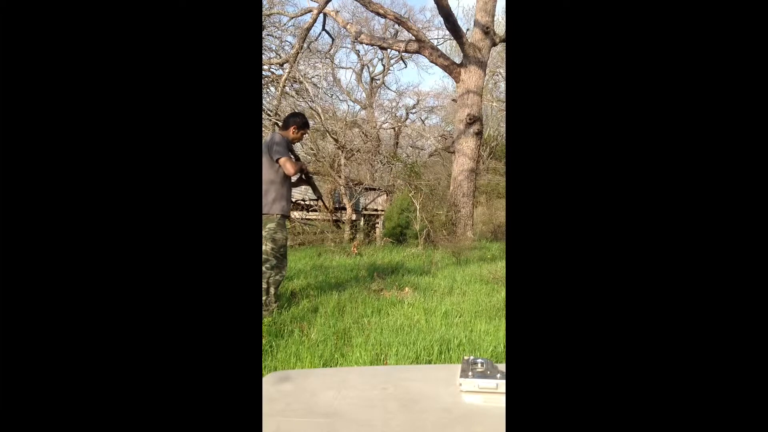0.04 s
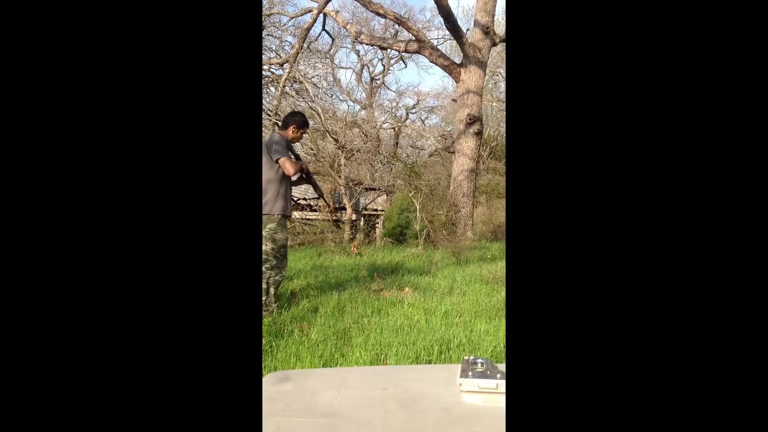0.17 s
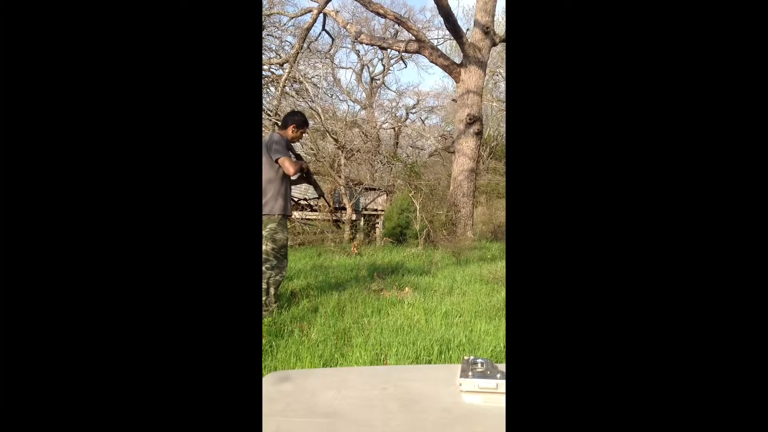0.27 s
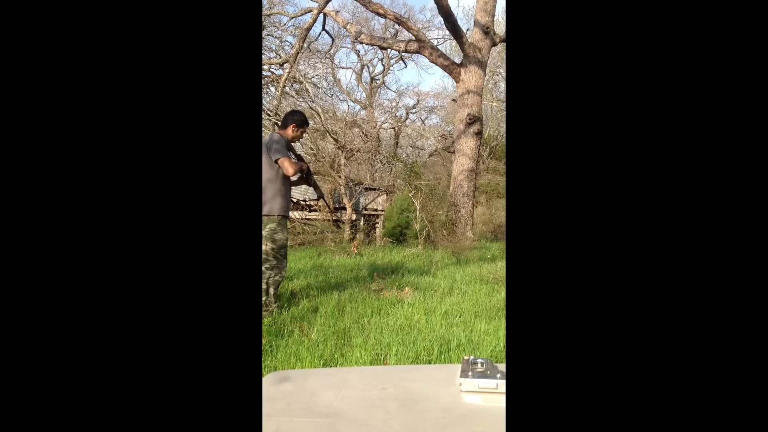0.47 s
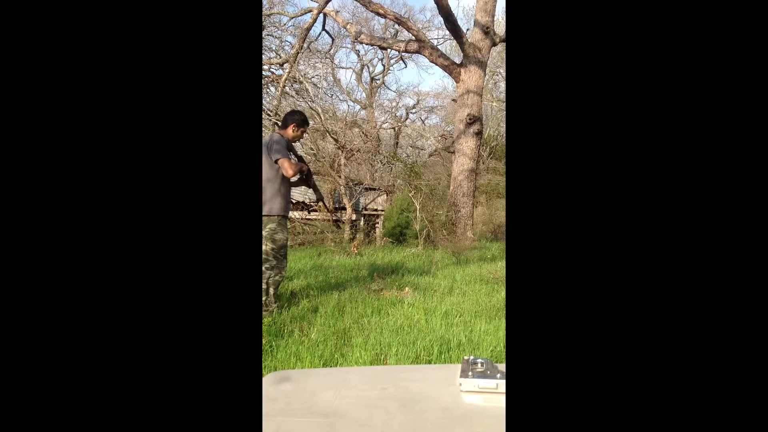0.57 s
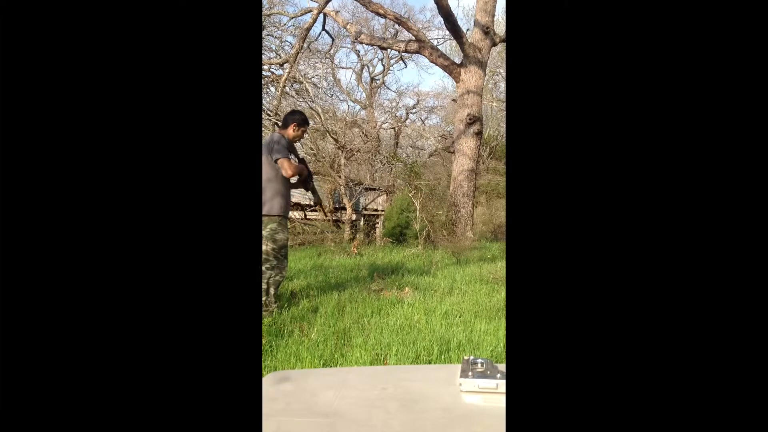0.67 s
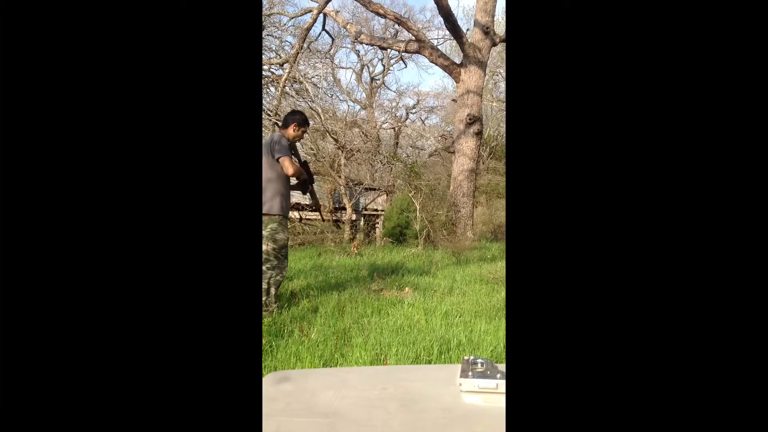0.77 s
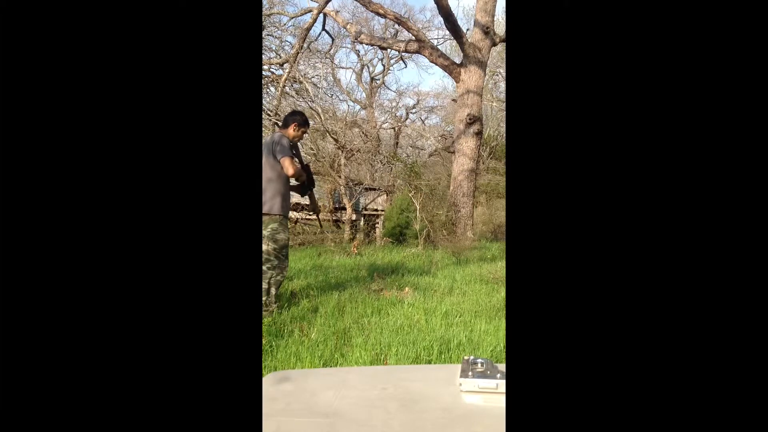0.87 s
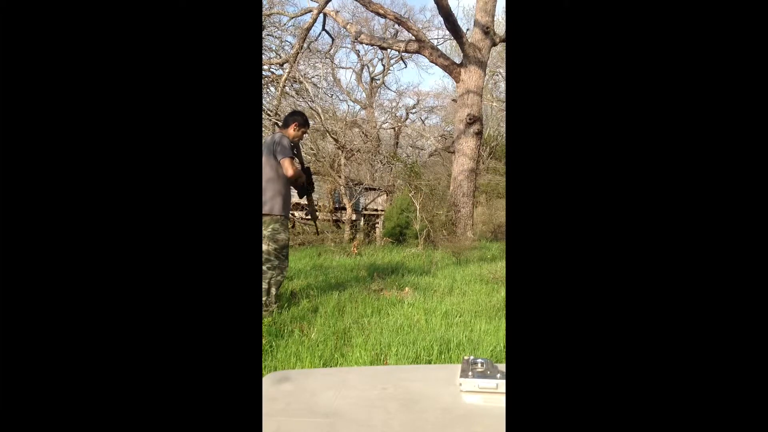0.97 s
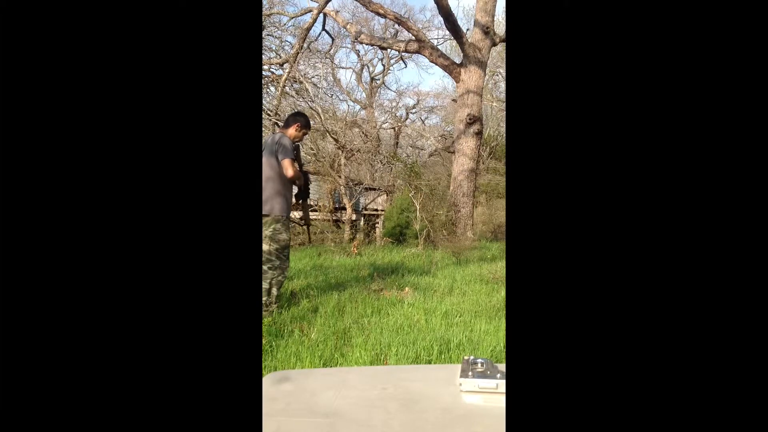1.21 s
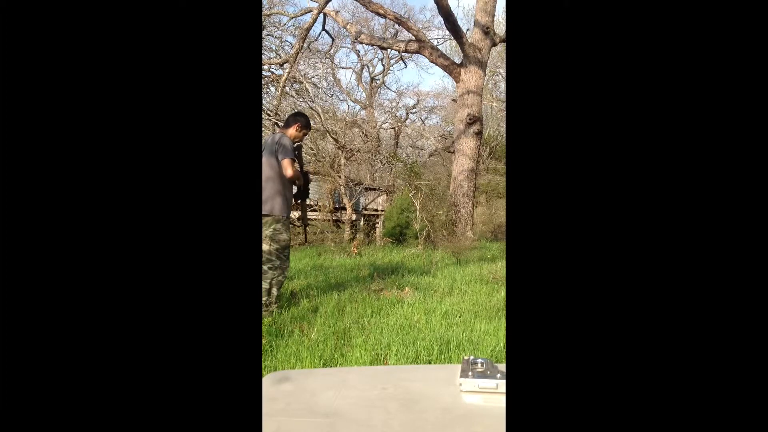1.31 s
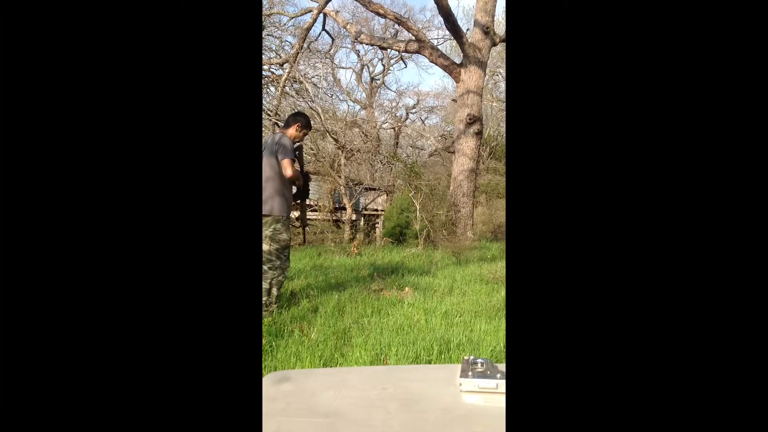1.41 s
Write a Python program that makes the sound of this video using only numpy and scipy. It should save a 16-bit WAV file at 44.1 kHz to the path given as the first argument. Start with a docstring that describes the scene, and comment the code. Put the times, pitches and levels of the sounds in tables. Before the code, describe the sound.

In a quiet yard among trees, a small bird chips, then a rifle bolt slides shut with a bright metallic clack that rings and echoes briefly. Hands shift softly on the rifle while birds whistle far off.

```python
"""In a wooded yard, a rifle's bolt is let go: the catch snaps, the carrier scrapes forward on its spring
and slams shut, steel on steel. The rifle rings briefly, a wall throws back an echo and the trees
scatter a tail. Hands knock and rub lightly on the rifle before and after. A small bird chips twice
nearby; others whistle far off over a faint outdoor hush."""
import sys
import numpy as np
from scipy import signal
from scipy.fft import rfft, irfft
from scipy.io import wavfile

SR = 44100
rng = np.random.default_rng(int(sys.argv[2]) if len(sys.argv) > 2 else 0)


def master_out(mix):
    """Clip the mix to full scale and print it as 16-bit PCM to the path in sys.argv[1]."""
    frames = np.transpose(np.atleast_2d(mix))
    ceiling = np.clip(frames, -1, 1)
    pcm = np.round(ceiling * 32767).astype(np.int16)
    wavfile.write(sys.argv[1], SR, pcm)


N = 63945
TIME = np.arange(N) / SR
CUTOFF_HZ, SHARP_RISE_S = 15300, .00028

# The catch snapping free. Each row: start in seconds, level in dB, decay time constant in seconds.
CATCH_SNAPS = [(0.2304, -16, .0017)]
# The carrier slamming shut. Each row: start in seconds, level in dB, decay time constant in seconds.
CARRIER_SLAMS = [(0.2796, -13.5, .002), (0.2822, -11.5, .0016)]


def from_db(db):
    """Decibels to gain."""
    return 10 ** (np.asarray(db) / 20)


def unit_rms(x):
    """Scale to rms 1."""
    return x / np.sqrt(np.mean(x ** 2) + 1e-20)


def coloured(x, colour):
    """Shape a signal with an EQ curve drawn on a log-frequency axis, rms 1."""
    hz = np.fft.rfftfreq(N, 1 / SR)
    curve_hz, curve_db = np.transpose(colour)
    gain = from_db(np.interp(np.log(np.maximum(hz, 1)), np.log(curve_hz), curve_db))
    return unit_rms(irfft(rfft(x) * gain * (hz < CUTOFF_HZ) * (hz > 20), N))


def noise(colour):
    """Steady noise of a given colour, rms 1."""
    return coloured(rng.standard_normal(N), colour)


def low_cut(x, hz):
    """Roll off the lows at 12 dB per octave."""
    return signal.sosfilt(signal.butter(2, hz, "high", fs=SR, output="sos"), x)


def drift(per_second):
    """A random wander, roughly between -1 and 1."""
    return np.interp(TIME * per_second, np.arange(1000), rng.standard_normal(1000))


def burst(start, rise, decay):
    """Straight attack, then exponential decay; times in seconds."""
    age = TIME - start
    return np.clip(age / rise, 0, 1) * np.exp(-np.maximum(age - rise, 0) / decay)


def click(start):
    """A unit click."""
    return 1. * (np.arange(N) == int(start * SR))


def ring(drive, hz, t60):
    """One resonance: a unit click sets a sine of height 1 ringing."""
    r, w = from_db(-60 / (t60 * SR)), 2 * np.pi * hz / SR
    return signal.lfilter([0, np.sin(w)], [1, -2 * r * np.cos(w), r * r], drive + 1e-18)


def contacts(rows, colour, rise_s):
    """Short bursts of contact noise."""
    return noise(colour) * sum(from_db(db) * burst(start, rise_s, decay) for start, db, decay in rows)


def tail(t60):
    """Envelope of scattered sound, with unit energy."""
    shape = burst(0, rise=.012, decay=t60 / np.log(1000))
    return shape / np.sqrt(np.sum(shape ** 2))


def among_trees(call, scatter_db, t60):
    """A call and its scatter from the branches."""
    return call + from_db(scatter_db) * signal.fftconvolve(call, tail(t60) * rng.standard_normal(N))[:N]


def outdoor_hush():
    """A faint, dark bed of noise whose level sways."""
    # The bed's colour. Each row: frequency in Hz, relative level in dB.
    colour = [(15, -49.5), (25, -24.5), (81, -3), (142, 1), (250, -4.5), (301, -8.5), (488, -9.5),
              (903, -15), (1390, -16), (1580, -16.5), (2780, -14.5), (3180, -18), (15000, -24.5)]
    # The level it sways around. Each row: time in seconds, level in dB.
    fader = [(0, -63.5), (0.2, -65), (0.4, -69.5), (0.85, -70), (1.1, -68), (1.45, -66)]
    sway_db = 1.85 * drift(per_second=6.9)
    return from_db(np.interp(TIME, *np.transpose(fader)) + sway_db) * noise(colour)


def handling():
    """Small damped knocks and brief rubs of hand and sling."""
    # Light knocks on the rifle. Each row: start in seconds, level in dB, pitch in Hz, t60 in seconds.
    knocks = [(0.0108, -41.5, 5940, 0.00087), (0.0341, -51.5, 822, 0.038), (0.787, -63, 109, 0.054),
              (0.949, -57.5, 140, 0.066)]
    # The hands shifting. Each row: start in seconds, level in dB, decay time constant in seconds.
    rubs = [(0.012, -65, 0.025), (0.699, -65.5, 0.0045), (0.732, -67.5, .012), (0.786, -61, 0.0032),
            (0.875, -70, 0.017), (0.957, -63.5, 0.0041)]
    # Their dull colour. Each row: frequency in Hz, relative level in dB.
    rub_colour = [(80, 8), (400, 1.5), (1600, 0.5), (3000, -3.5), (6000, -5.5), (9000, -12), (15000, -16.5)]
    knocking = sum(from_db(db) * ring(click(start), hz, t60) for start, db, hz, t60 in knocks)
    return knocking + contacts(rubs, rub_colour, rise_s=.0023)


def far_birds():
    """Soft gliding whistles with a slight waver, blurred by the wood."""
    # Distant calls. Each row: start and length in seconds, first and last pitch in Hz, level in dB.
    whistles = [(0.047, 0.16, 2166, 1920, -73.5), (0.675, .09, 2180, 1926, -71.5),
                (0.845, .03, 3040, 3000, -78), (0.934, 0.026, 2870, 2750, -69.5),
                (0.97, 0.11, 2473, 2866, -75.5), (1.037, .115, 2090, 1866, -71.5),
                (1.071, 0.025, 2420, 2740, -69.5), (1.114, .06, 3310, 3480, -77),
                (1.191, .025, 3270, 2930, -71.5), (1.229, 0.022, 2365, 2435, -70),
                (1.26, 0.0363, 2600, 2860, -66.5), (1.298, .05, 2400, 2530, -71.5),
                (1.385, .04, 2100, 2600, -67), (1.403, 0.048, 2033, 1950, -66)]
    calls, waver = 0, 1 + .014 * drift(per_second=120)
    for start, length, from_hz, to_hz, db in whistles:
        along = np.clip((TIME - start) / length, 0, 1)
        hz = (from_hz + (to_hz - from_hz) * along) * waver
        swell = from_db(db) * np.abs(np.sin(np.pi * along)) ** .5
        calls += swell * np.sin(2 * np.pi * np.cumsum(hz) / SR)
    return among_trees(calls, scatter_db=-3.5, t60=.27)


def near_bird():
    """Each chip sweeps up fast and levels off as it fades, with a faint octave above."""
    # The two chips. Each row: start in seconds, level in dB.
    chips = [(0.1183, -40.5), (1.135, -49)]
    from_hz, to_hz, glide_s, scatter_t60 = 4950, 8100, .0056, .33
    tone, octave = 0, 0
    for start, db in chips:
        hz = to_hz + (from_hz - to_hz) * np.exp(-np.maximum(TIME - start, 0) / glide_s)
        phase = 2 * np.pi * np.cumsum(hz) / SR
        shape = from_db(db) * burst(start, rise=.004, decay=.0075)
        tone += shape * np.sin(phase)
        octave += shape * np.sin(2 * phase)
    tone = among_trees(tone, scatter_db=-6, t60=scatter_t60)
    octave = among_trees(octave, scatter_db=4.5, t60=scatter_t60)  # arrives mostly by way of the branches
    return tone + from_db(-25) * octave


def catch_snap():
    """The catch lets go with a short, bright snap of steel."""
    # The snap's colour. Each row: frequency in Hz, relative level in dB.
    colour = [(60, -14.5), (180, -6.5), (800, -8), (1500, -19), (2800, -9), (3650, 7.5), (4800, -9),
              (6200, 0.5), (8200, 3), (10500, -4.5), (14000, -3.5)]
    return contacts(CATCH_SNAPS, colour, rise_s=.0015)


def rifle_ring(friction):
    """The rifle's modes ring, struck by the catch and the slam and rubbed by the carrier."""
    # The steel's modes. Each row: pitch in Hz, t60 in seconds, level in dB when struck and when scraped.
    modes = [(508.4, 0.071, -26.5, -51), (766, 0.067, -32.5, -35), (810, 0.059, -45.5, -47),
             (1241, .05, -38, -41), (1424, .07, -35, -40.5), (2232, 0.1, -33, -45.5),
             (2826, .08, -39, -47.5), (3864, .06, -28.5, -37), (4010, 0.097, -34, -37.5),
             (4216, 0.063, -36, -37.5), (6075, .08, -26.5, -53.5), (6330, .05, -27.5, -41),
             (8565, .045, -21.5, -37), (10510, .11, -30, -44.5)]
    release_s = CATCH_SNAPS[0][0]
    blows = click(CARRIER_SLAMS[0][0]) + from_db(-9.5) * click(release_s)
    sliding = (TIME > release_s) & (TIME < CARRIER_SLAMS[-1][0])
    ringing = 0
    for k, (hz, t60, struck_db, scraped_db) in enumerate(modes):
        struck = from_db(struck_db) * (-1) ** k * ring(blows, hz, t60)
        scraped = ring(friction * rng.standard_normal(N), hz, t60)
        scraped *= from_db(scraped_db) / scraped[sliding].std()
        ringing += low_cut(struck + scraped, .77 * hz)  # a mode radiates little below its pitch
    return ringing


def carrier_scrape():
    """The sliding carrier catches on tiny snags: returns the gritty scrape and its friction envelope."""
    # The scrape grows as the carrier speeds up. Each row: time in seconds, level in dB.
    travel = [(0.232, -42), (0.236, -37.5), (0.243, -30), (0.246, -26), (0.255, -25.5), (0.262, -33.5),
              (0.265, -25), (0.277, -25), (0.284, -32), (0.296, -61)]
    # The scrape's colour. Each row: frequency in Hz, relative level in dB.
    colour = [(60, -36), (310, -36.5), (430, -24), (620, -1.5), (1000, 1), (1400, 2), (2200, -5.5),
              (4000, -1), (5000, -4.5), (8300, -0.5), (11000, -4.5), (15000, -10.5)]
    snags_per_s, snag_decay_s, snag_spread_db = 3000, .00079, .5
    effort = from_db(np.interp(TIME, *np.transpose(travel), left=-150, right=-150))
    snags = (rng.random(N) < snags_per_s / SR) * from_db(snag_spread_db * rng.standard_normal(N))
    grit = unit_rms(signal.lfilter([1], [1, -np.exp(-1 / (snag_decay_s * SR))], snags))
    return effort * coloured(grit * rng.standard_normal(N), colour), effort * grit


def carrier_slam():
    """Steel hits steel in a tight double crack, and the small parts jingle after it."""
    # The crack's colour. Each row: frequency in Hz, relative level in dB.
    crack_colour = [(50, -24.5), (230, -24), (500, -5), (950, -6), (1350, -9), (1800, -10), (3000, -7),
                    (5000, -1), (7000, 3.5), (11000, -1.5), (15000, -8.5)]
    # The dense ring of the small parts. Each row: frequency in Hz, relative level in dB.
    jingle_colour = [(100, -30), (450, -5), (900, 0.5), (1400, -0.5), (1900, -7), (4000, -0.5), (6000, 2),
                     (9000, -1), (15000, -2.5)]
    crack = contacts(CARRIER_SLAMS, crack_colour, SHARP_RISE_S)
    jingle = from_db(-25) * burst(CARRIER_SLAMS[-1][0], SHARP_RISE_S, decay=.011) * noise(jingle_colour)
    return crack + jingle


def yard_echoes(x):
    """A slightly smeared slap off the wall, dense early scatter and a longer tail from the trees."""
    # The yard's scatter. Each row: band centre in Hz, early level in dB, early t60 in seconds,
    # late level in dB, late t60 in seconds.
    bands = [(100, -24.5, .15, -37.5, .4), (500, -20, 0.16, -36, .45), (1300, -15, 0.23, -22, 0.84),
             (2300, -10.5, 0.49, -17.5, .65), (4000, -15.5, .24, -23.5, .7),
             (5727, -13.5, 0.54, -16.5, 0.57), (8500, -16.5, .25, -27, .62), (15000, -7.5, 0.23, -29.5, .5)]
    # The wall echo's colour. Each row: frequency in Hz, relative level in dB.
    wall_colour = [(150, -8), (700, 2), (1400, 2), (3500, -2.5), (6000, 4.5), (8000, -9), (15000, -7.5)]
    log_hz, centres = np.log(np.fft.rfftfreq(N, 1 / SR) + 1), np.log([row[0] for row in bands])
    white, scatter = rfft(rng.standard_normal(N)), 0
    for share, (_, early_db, early_t60, late_db, late_t60) in zip(np.eye(len(bands)), bands):
        band = irfft(white * np.interp(log_hz, centres, share), N)
        scatter += band * np.hypot(from_db(early_db) * tail(early_t60), from_db(late_db) * tail(late_t60))
    slap = noise(wall_colour) * burst(start=.0465, rise=SHARP_RISE_S, decay=.003)
    slap *= from_db(-21.5) / np.sqrt(np.sum(slap ** 2))
    return signal.fftconvolve(x, scatter + slap)[:N]


def scene():
    """The rifle in the yard, the birds and the hush, in mono."""
    hush = outdoor_hush()
    scrape, friction = carrier_scrape()
    bolt = scrape + catch_snap() + carrier_slam()
    bolt, ringing = low_cut([bolt, rifle_ring(friction)], hz=130)
    contact = bolt + handling()
    echoes = yard_echoes(contact + from_db(-6.5) * ringing)  # the ringing carries less far than the cracks
    return (contact + ringing + echoes + near_bird() + far_birds() + hush)[None]


def record(dry):
    """The top is cut steeply."""
    return signal.sosfilt(signal.ellip(10, .2, 75, CUTOFF_HZ, fs=SR, output="sos"), dry)


dry = scene()
out = record(dry)
master_out(out)
```